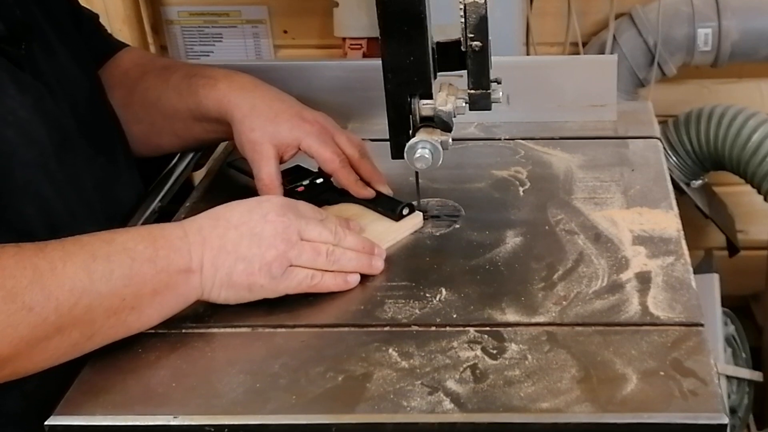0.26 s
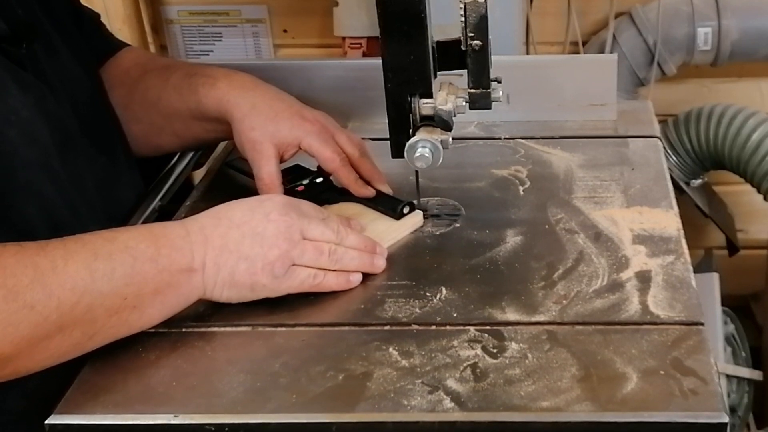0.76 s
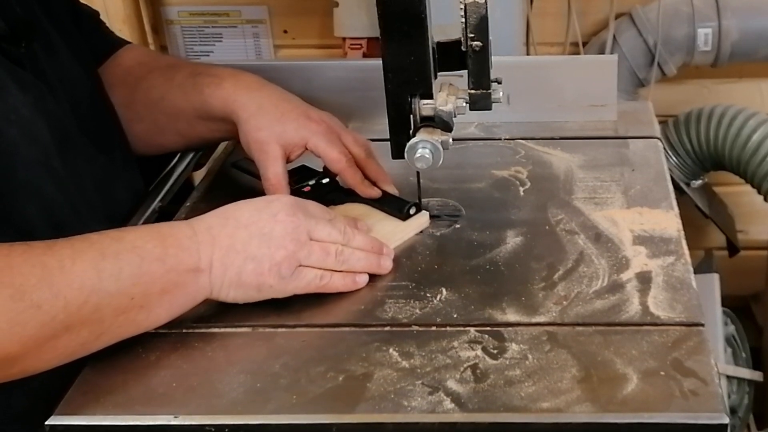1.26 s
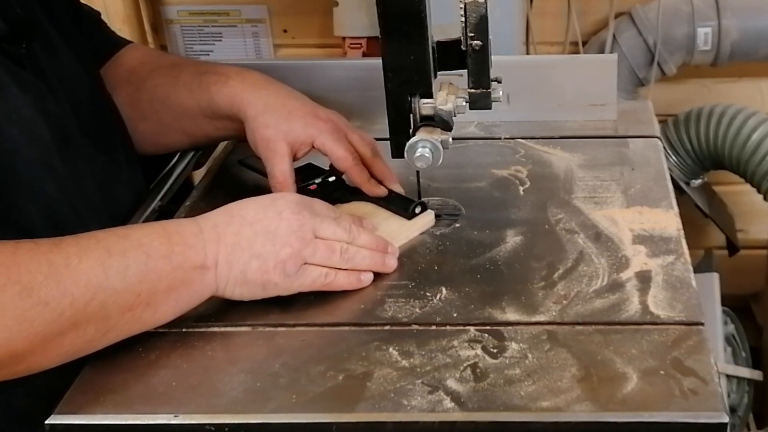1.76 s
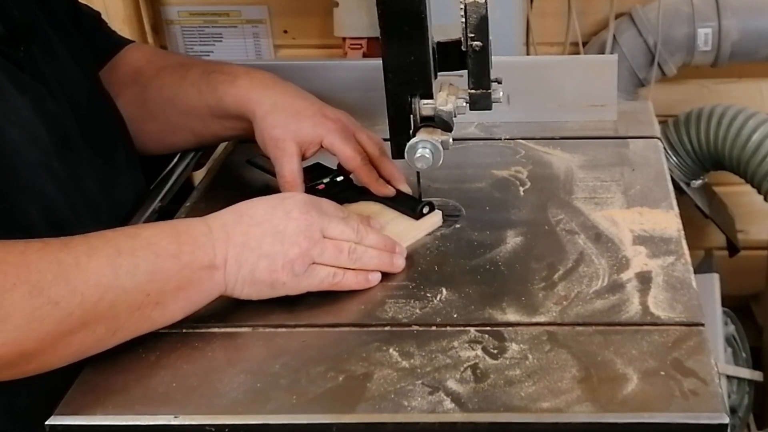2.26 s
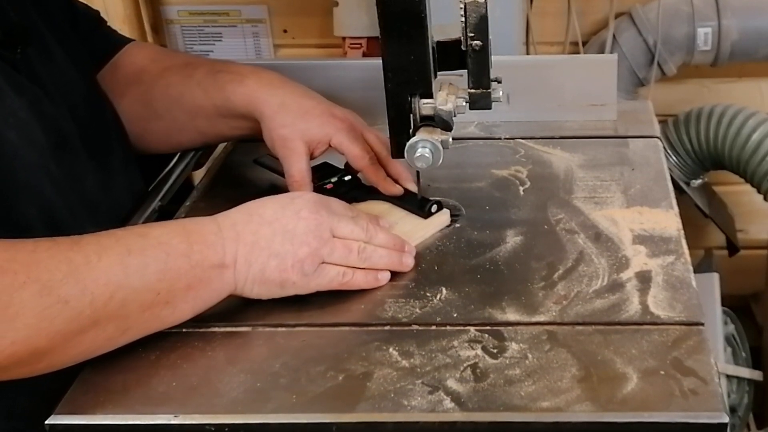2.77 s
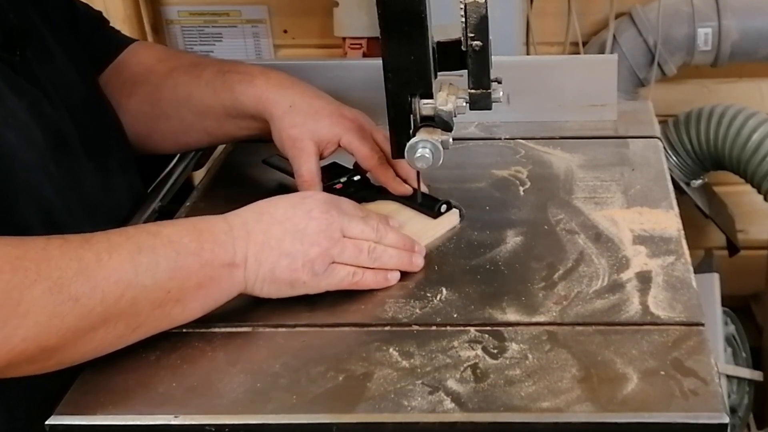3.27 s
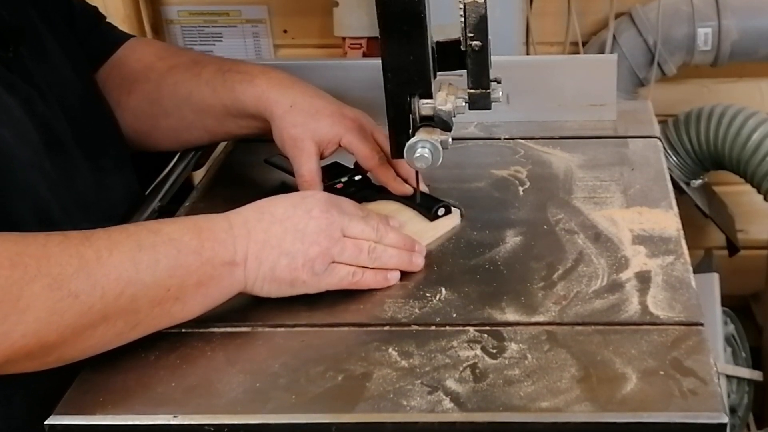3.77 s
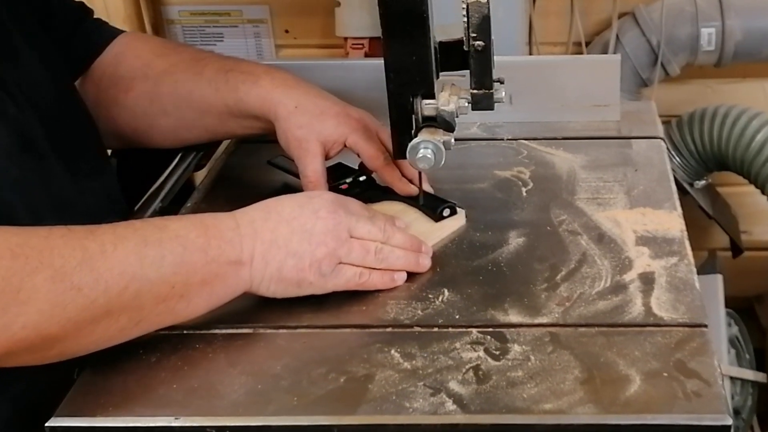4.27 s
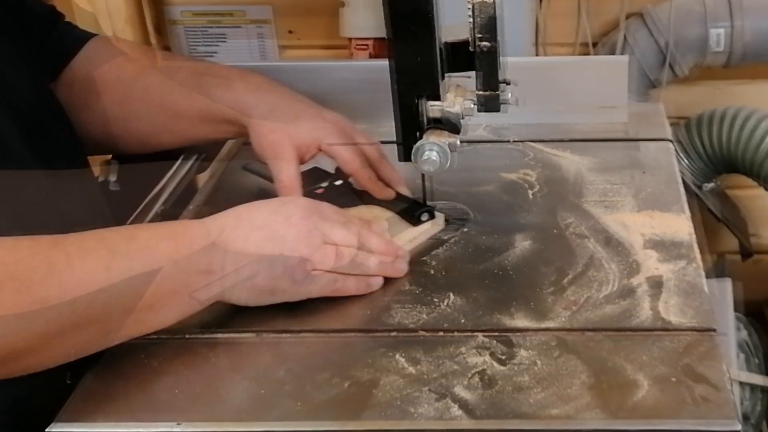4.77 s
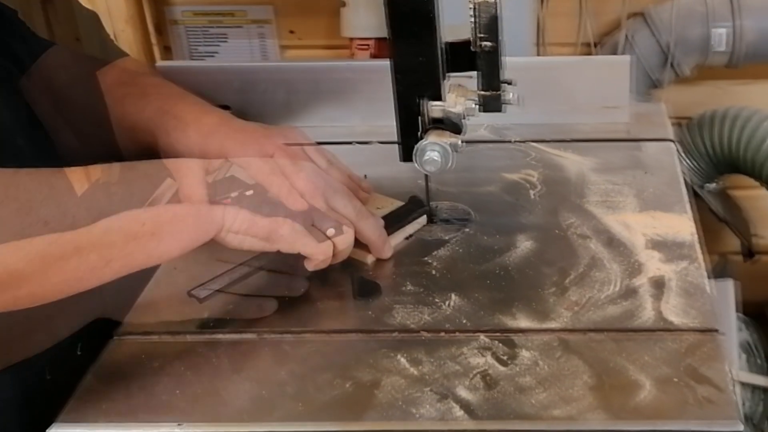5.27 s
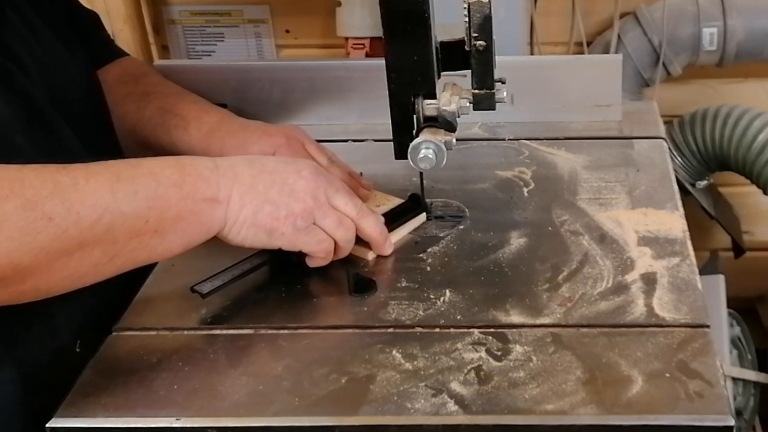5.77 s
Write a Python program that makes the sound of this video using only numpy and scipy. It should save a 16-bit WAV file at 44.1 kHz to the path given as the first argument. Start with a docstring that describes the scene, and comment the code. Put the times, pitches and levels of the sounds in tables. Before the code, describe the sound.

Close and fairly dry, in a small cluttered workshop, with a low machine hum and soft extractor air underneath throughout. From 0 to 1.2 seconds a small wooden piece grazes and chatters on a bandsaw blade: a rough, uneven rasp with a sharp snag and falling twang near 0.5, then rough pulsing tones around 1. At about 1.25 the teeth bite loudly with a piercing squeal and a ringing blade tone. From 1.7 to 3.5 the cut is dense and bright, fluttering rapidly, with whistles and a high screech strongest around 2.3 to 3.2. It breaks off near 3.8. Until 5.1 only light rubs, scrapes, tiny cracks and faint downward twangs interrupt the hum, one longer rub at 4.4 to 4.6. The blade runs free briefly, then at 5.3 a second cut starts, rasping harder from 5.7 with a faint ring, continuing to the end at about 6.

```python
"""In a workshop, close by, a bandsaw cuts a curve in a small piece of wood.
The piece chatters against the blade, then the teeth bite and the blade sings as it twists in the kerf (the slot).
The piece is eased back and rubs, the blade runs free for a moment, and a second cut begins; the machine hums below.
Tooth pulses and torn-fibre noise make the bites, short noise cracks the snags, coloured noise the air and hum,
wavering sine waves the blade's tones, and gliding narrow bands of noise its twangs."""
import sys
import numpy as np
from scipy import signal
from scipy.fft import rfft, irfft
from scipy.io import wavfile
from scipy.ndimage import uniform_filter1d, minimum_filter1d

SR = 44100
rng = np.random.default_rng(int(sys.argv[2]) if len(sys.argv) > 2 else 0)


def master(y):
    """Save y as 16-bit WAV."""
    cut = np.clip(np.atleast_2d(y).T, -1, 1)
    pcm = np.round(cut * 32767)  # scale
    wavfile.write(sys.argv[1], SR, pcm.astype(np.int16))


N = 266136
TIME = np.arange(N) / SR
FREQ = np.fft.rfftfreq(8192, 1 / SR)  # where the colour of a sound is set, in Hz
# average rates of the passing teeth, the blade's twisting and bending modes, and the bouncing piece
TOOTH_HZ, TWIST_HZ, BEND_HZ, BOUNCE_HZ = 3388.4, 1025, 785, 138
TONE_RISE_S, TONE_RELEASE_S = 0.022, 0.03  # the tones given by start and end swell and die away alike


def amp(db):
    """Turns decibels into gain."""
    return 10 ** (np.asarray(db) / 20)


def unit(x):
    """Scales a sound to an rms of one."""
    return x / np.sqrt(np.mean(x ** 2) + 1e-20)


def steady(x, size=1800):
    """Evens out the level from moment to moment (size in samples), keeping the fine grain."""
    power = uniform_filter1d(uniform_filter1d(x ** 2, size), size)
    return x / np.sqrt(abs(power) + 1e-12)


def wander(hz):
    """Makes a smooth random curve of unit rms that changes about hz times a second."""
    f = np.fft.rfftfreq(N, 1 / SR)
    spectrum = rfft(rng.standard_normal(N)) * np.exp(-(f / hz) ** 2)
    return unit(irfft(spectrum, N))


def angle(hz, drift, drift_hz):
    """Adds up the phase of an oscillation whose rate drifts a little."""
    return 2 * np.pi * np.cumsum(hz * (1 + drift * wander(drift_hz))) / SR


def band(x, lo_hz, hi_hz, order=4):
    """Keeps only the pitches between two limits."""
    sos = signal.butter(order, [lo_hz, min(hi_hz, .49 * SR)], "band", fs=SR, output="sos")
    return signal.sosfilt(sos, x)


def read(points, hz):
    """Reads a colour table, joined by straight lines on a log-frequency axis."""
    f, value = np.transpose(points)
    return np.interp(np.log(hz + 1), np.log(f + 1), value)


def resonances_db(modes):
    """Turns narrow peaks and dips into a gain at each of FREQ."""
    return sum(db / (1 + (2 * (FREQ - hz) / width) ** 2) for hz, width, db in modes)


def ring(x, db):
    """Passes a sound through a body that has this gain at each of FREQ and answers only after each blow."""
    log_gain = np.log(amp(np.r_[db, db[-2:0:-1]]))
    # the Hilbert transform finds the phase that makes the body answer as early as it can
    response = np.fft.ifft(np.exp(np.conj(signal.hilbert(log_gain)))).real
    return signal.oaconvolve(x, response[:len(response) // 2])[:N]


def swell(rows):
    """Follows a level curve as a gain, silent outside its span."""
    s, db = np.transpose(rows)
    return amp(np.interp(TIME, s, db, left=-120, right=-120))


def held(start, end, rise_s, release_s):
    """Rises, holds and dies away."""
    rise = np.clip((TIME - start) / rise_s, 0, 1)
    return rise * np.exp(-np.maximum(TIME - end, 0) / release_s)


def sung(rows):
    """Gives the gain of a tone that sings up and dies away once for each row."""
    return sum(amp(db) * held(start, end, TONE_RISE_S, TONE_RELEASE_S) for start, end, db in rows)


# drone of the frame: [t/s, level/dB]
DRONE = [(0.0, -57), (0.1, -41.5), (0.28, -50), (0.4, -41.5), (0.52, -57), (0.97, -44.5), (1.44, -63),
         (4.59, -52), (4.8, -44), (4.85, -60.5), (5.62, -54.5), (5.78, -69), (6.03, -54)]
# its colour: [f/Hz, level/dB]
DRONE_COLOUR = [(60, -46), (120, -23), (150, -17), (178, -3), (200, -2.5), (225, -2.5), (270, -12),
                (330, -25), (500, -57), (1000, -60)]
# colour of the dust extractor's air: [f/Hz, level/dB]
AIR_COLOUR = [(25, -20), (70, -11), (200, 4), (350, -1), (600, -0.5), (1000, -3), (1600, -9.5), (3000, -24),
              (6000, -29.5), (9000, -37), (15000, -58)]


def machine(air_db=-56):
    """The wheels shake the frame into a low drone, and the extractor draws air: two coloured noises."""
    drone = steady(ring(rng.standard_normal(N), read(DRONE_COLOUR, FREQ)), size=3000)
    air = unit(ring(rng.standard_normal(N), read(AIR_COLOUR, FREQ)))
    s, drone_db = np.transpose(DRONE)
    return amp(np.interp(TIME, s, drone_db)) * drone + amp(air_db) * air


# the blade snatches (+) or slips (-) for a moment: [t/s, half length/s, change of level/dB]
SURGES = [(0.12, 0.0076, 0.5), (.153, .011, 4.5), (0.595, 0.009, 5.5), (0.497, 0.022, 6.5),
          (0.667, 0.006, 7.5), (0.893, 0.018, 4), (.985, 0.011, -2), (1.241, 0.0048, -10),
          (1.445, .012, -2), (1.575, 0.048, -5.5), (1.616, 0.011, 10), (1.656, 0.018, -9),
          (1.877, 0.019, -4), (1.944, 0.013, -5.5), (1.981, 0.017, 3.5), (2.014, 0.014, -5.5),
          (2.178, .012, -2), (2.318, 0.0091, -3.5), (2.381, .012, -5.5), (2.751, 0.032, -4),
          (2.81, 0.011, -7), (3.455, .008, 4.5), (3.481, 0.014, -6.5), (3.75, 0.0057, 5.5),
          (5.737, 0.0058, 5.5), (5.875, 0.0077, 8)]


def surging(sway_db, sway_hz=16.1, sway_at_s=2.343):
    """The level changes, in dB, as the running blade sways to and from the wood, snatches and slips."""
    sway = sway_db * np.cos(2 * np.pi * sway_hz * (TIME - sway_at_s))  # presses hardest at sway_at_s
    return sway + sum(db * np.exp(-((TIME - s) / half_s) ** 2) for s, half_s, db in SURGES)


# how hard the piece is fed in the first cut, before the surges: [t/s, level/dB]
FIRST_FEED = [(0, -23.5), (.22, -29), (.34, -25.5), (.44, -29.5), (.462, -23), (.8, -26.5), (1.225, -28),
              (1.28, -19), (1.43, -14.5), (1.55, -21.5), (2.05, -21.5), (2.6, -18), (2.95, -19),
              (3.265, -21), (3.3, -16.5), (3.52, -26), (3.62, -17.5), (3.75, -17.5), (3.785, -30.5),
              (3.89, -56)]
# light drag in the kerf as the piece is eased back, until the blade runs free: [t/s, level/dB]
DRAG = [(3.8, -34.5), (4.08, -42), (4.3, -44), (4.46, -38.5), (4.78, -44), (5.06, -46), (5.2, -67.5),
        (5.31, -78)]
# the feed of the second cut: [t/s, level/dB]
SECOND_FEED = [(5.308, -54.5), (5.335, -30.5), (5.385, -24.5), (5.55, -29.5), (5.68, -17.5), (5.81, -23.5),
               (5.925, -27), (5.98, -16), (6.04, -17.5)]
# the side of the kerf rubs on the blade: [start t/s, end t/s, rise/s, blade level/dB, wood level/dB]
RUBS = [(3.957, 4.055, 0.013, -27, -49), (4.099, 4.116, .01, -33.5, -60), (4.132, 4.15, 0.021, -31, -41),
        (4.369, 4.438, 0.1, -20, -31), (4.522, 4.64, 0.032, -27.5, -36), (4.667, 4.684, .014, -33, -41),
        (4.708, 4.719, .01, -35, -42.5), (4.743, 4.748, 0.0018, -34, -30.5),
        (4.808, 4.892, .004, -37.5, -49), (4.89, 4.912, .012, -41, -58), (4.943, 4.956, 0.015, -35, -56),
        (5.02, 5.029, 0.017, -28.5, -39), (5.058, 5.06, .003, -30, -31)]


def loads(surge_db, knock_db, wood_surge=0.68, rub_release_s=0.01):
    """Blade and wood are driven by the feed with its surges, and by the single rubs."""
    feed = swell(FIRST_FEED) + swell(DRAG) + swell(SECOND_FEED)
    blade = feed * amp(surge_db)
    wood = feed * amp(knock_db + wood_surge * surge_db)
    for start, end, rise_s, blade_db, wood_db in RUBS:
        touch = held(start, end, rise_s, rub_release_s)
        blade = np.hypot(blade, amp(blade_db) * touch)
        wood = np.hypot(wood, amp(wood_db) * touch)
    return blade, wood


# colour of blade and wood in each kind of work, each table: [f/Hz, level/dB]
GRAZE = [(100, -33.5), (330, -22.5), (610, -23.5), (750, -1.5), (880, 7.5), (1020, -1), (1470, 3.5),
         (2300, -12.5), (3750, -7), (5200, -12.5), (5800, -15), (6240, -21.5), (7790, -25.5),
         (11570, -46.5), (13370, -37.5), (15000, -49)]
BITE = [(100, -71), (330, -42), (820, 4), (2040, 7), (2300, 0.5), (2830, 8.5), (5200, 3.5), (5800, -1),
        (6240, -6), (7370, -1), (8290, -20.5), (12100, -29.5), (13000, -21.5), (15000, -28)]
CUT = [(100, -70.5), (330, -33), (610, -21.5), (750, 0.5), (2040, -2), (2150, -3.5), (2960, -7.5),
       (4640, 2), (7370, -6.5), (9350, -24), (11230, -20), (12450, -30), (13370, -27.5), (15000, -31)]
DEEP = [(100, -42), (330, -21), (610, -24), (750, -1), (2040, -0.5), (2250, -12), (2830, -2), (3140, -7.5),
        (3450, -5.5), (5450, 10), (5800, -4.5), (6400, -6.5), (8200, -15), (9820, -31), (10600, -26),
        (12450, -29), (14000, -38), (15000, -31.5)]
BREAKOUT = [(120, -68), (200, -28), (540, -30.5), (647, -16.5), (761, -15.5), (1040, -4.5), (1330, -3.5),
            (2170, -7), (2460, -13), (3470, -4), (4240, -8), (5660, -6.5), (15000, -46.5)]
RUB = [(100, -28), (330, -31.5), (750, -4.5), (1090, 8.5), (1380, 0.5), (2420, -2), (3610, 0), (5030, -0.5),
       (5620, -6), (6240, -9.5), (7090, -6), (8810, -28), (12730, -26), (15000, -46)]
MEET = [(120, -39), (200, -22), (363, -41), (427, -27), (636, -30.5), (849, -1.5), (1330, -6), (1780, 1.5),
        (2550, -9), (3470, -3), (4310, -13.5), (5070, -11), (15000, -51.5)]
SECOND = [(100, -58), (330, -51), (820, -2.5), (1560, 2), (1790, -2), (2420, -7), (3950, -2), (4260, -2.5),
          (5200, -6.5), (7090, -15.5), (7790, -12.5), (8290, -25), (12730, -39), (15000, -39)]
# stages of the work: [start t/s, colour, then three levels against the load: wood knock level/dB,
# set tone level/dB, side ring level/dB; sway/dB, blade twist depth, bouncing of the piece,
# depth of the tooth set, unevenness of the bites, torn fibre share 0-1]
STAGES = [(0, GRAZE, -11, -11, -14, 0, .04, 0.38, 0.23, 0.51, 0.96),
          (.45, GRAZE, -10.5, -7.5, -21, 0.66, 0.056, 0.95, 0.27, 0.31, 0.99),
          (.94, GRAZE, -14, -0.5, -4.5, 0, .05, 0.039, 0.55, 0.5, 0.99),
          (1.27, BITE, -6.5, -18.5, -36, 0, 0.27, 0.12, .05, 0.82, 0.99),
          (1.68, CUT, -7, -32, -47, 0.38, 0.73, 0.097, 0.038, 0.84, 0.98),
          (2.2, CUT, -13, -27, -47, 0.92, 0.98, 0.2, .05, 0.36, 0.68),
          (2.55, DEEP, -13.5, -29, -56, 0.63, 0.97, .08, 0.082, 0.08, 0.45),
          (3.53, BREAKOUT, -8.5, -13.5, -34, 0, 0.95, 0.042, 0.12, 0.26, 0.97),
          (3.86, RUB, -5.5, -13, -2.5, 0, .04, 0.45, 0.5, 0.76, 0.82),
          (4.14, RUB, -3.5, -3, -13, 0, .04, 0.12, 0.57, 0.55, 0.91),
          (5.25, MEET, -5.5, -8, -13, 1.1, 0.062, 0.16, .2, 0.17, 0.89),
          (5.6, SECOND, -6, -16, -32.5, 0.38, 0.087, .18, 0.12, 0.61, 0.99)]


def by_stage(values, blend_s=0.21):
    """Takes one value for each stage and blends them where the stages meet."""
    return values[0] + sum((after - before) * np.clip((TIME - row[0]) / blend_s + .5, 0, 1)
                           for before, after, row in zip(values, values[1:], STAGES[1:]))


def contact():
    """The wood meets the teeth in a changing way: the number columns of STAGES, sample by sample."""
    _, _, *columns = zip(*STAGES)
    return [by_stage(column) for column in columns]


def teeth(turn, twist_angle, bend_angle, grip, bend_depth=0.32, clump=0.25, clump_hz=300):
    """Each tooth strikes and tears fibre; its bite varies with the set, the blade's sway and the bouncing piece."""
    twist, bounce, tooth_set, uneven, tearing = grip
    blows = unit(sum(np.cos(k * turn) for k in range(1, 5)))
    sway = twist * (np.cos(twist_angle) + bend_depth * np.cos(bend_angle))
    hop = bounce * np.cos(angle(BOUNCE_HZ, drift=0.0617, drift_hz=56.9))
    # the tooth set repeats every third tooth
    bite = np.exp(sway + hop + tooth_set * np.cos(turn / 3) + clump * wander(clump_hz))
    torn = np.clip(tearing, 0, 1)
    struck = unit(blows * np.exp(uneven * wander(3600)))
    fibres = unit(rng.standard_normal(N) * (1 + 0.85 * np.cos(turn)))
    return steady(bite * (np.sqrt(1 - torn) * struck + np.sqrt(torn) * fibres))


# narrow peaks and dips of blade, guides and table: [f/Hz, width/Hz, lift level/dB]
STEEL = [(482.4, 77, 17.5), (617, 24.4, 13.5), (864.4, 15.3, 8), (1523, 27, 1.5), (1420, 44, 6),
         (1854, 50, 9), (2090, 46, 6), (2283, 8.7, -16), (2725, 41, 10.5), (3677, 180, 8),
         (4300, 150, -2.5), (4270, 26, 1), (4490, 21, 13), (5093, 130, -13.5), (5870, 190, 8.5),
         (6480, 66, -3)]
# the same in the second cut, which rings differently: [f/Hz, width/Hz, lift level/dB]
SECOND_STEEL = [(465, 190, 18.5), (836, 36, 14), (1770, 16, 10), (1824, 52, 14), (1893, 130, 13.5),
                (2310, 31, 16), (2540, 70, 1), (3390, 25, 6.5), (3920, 45, 11), (4060, 88, 3),
                (4347, 70, -24), (4360, 70, 16), (5080, 13, 16), (5230, 38, 10)]


def rasp(drive, blade_load, wood_load, rasp_db=-2.0, split_hz=2250):
    """The bites ring blade (above the split) and wood (below), whose colour changes as the cut goes on."""
    stage_sounds = []
    for _, colour, *_ in STAGES:
        steel = SECOND_STEEL if colour == SECOND else STEEL
        stage_sounds.append(unit(ring(drive, read(colour, FREQ) + resonances_db(steel))))
    sound = by_stage(stage_sounds)
    low = signal.sosfiltfilt(signal.butter(6, split_hz, fs=SR, output="sos"), sound)
    blade = blade_load * steady(sound - low)
    # the wood is evened out by its power in the knocking range
    knock_power = uniform_filter1d(band(low, 1200, 2250) ** 2, size=4000)
    wood = wood_load * low / np.sqrt(abs(knock_power) + 1e-12)
    return amp(rasp_db) * blade + wood


def wavering(turn, rough, hz=45):
    """Makes a tone that is unsteady in both strength and phase."""
    return np.cos(turn) * (1 + rough * wander(hz)) + rough * wander(hz) * np.sin(turn)


# the tone of the tooth set sings up, before set_db: [start t/s, end t/s, level/dB]
SET_SWELLS = [(.92, .96, -25), (1.0, 1.05, -24.5), (1.09, 1.137, -22), (1.172, 1.21, -23),
              (1.24, 1.3, -25.5), (4.03, 4.11, -41), (4.14, 4.34, -50), (4.39, 4.47, -32.5),
              (4.53, 4.63, -26.5), (4.88, 4.93, -34.5)]
# its partials when the teeth graze the side of the kerf: [multiple of the set tone, relative level/dB]
SET_PARTIALS = [(3, -5), (4, -3), (5, 0)]


def set_tone(tone_load, side_load, set_db=-2, grazing_db=-3, set_rough=0.55):
    """The left-right-straight tooth set gives a rough tone, and a thin ring where it grazes the kerf's side."""
    turn = angle(TOOTH_HZ / 3, drift=0.00427, drift_hz=24.7)
    tone = steady(wavering(turn, set_rough))
    overtones = sum(amp(db) * wavering(k * turn, set_rough) for k, db in SET_PARTIALS)
    tone_level = np.hypot(tone_load, sung(SET_SWELLS))
    return amp(set_db) * tone_level * tone + amp(grazing_db) * side_load * overtones


# the piece snags on a tooth: [t/s, peak level/dB before snag_db and the ringing]
SNAGS = [(0.4599, -6), (0.7492, -10), (3.8192, -17), (3.9534, -12), (3.9729, -14), (4.0048, -12),
         (4.7127, -23), (4.7461, -23), (4.8194, -10), (4.8354, -14), (4.8604, -17), (4.8718, -15),
         (5.0295, -22), (5.0574, -23)]


def snags(snag_db=-5, tear_s=.0025):
    """A tooth catches and lets go: a short crack of noise rings the blade."""
    out = np.zeros(N)
    age = np.arange(SR // 50) / SR
    for s, db in SNAGS:
        crack = rng.standard_normal(len(age)) * np.exp(-age / tear_s)
        part = out[round(s * SR):][:len(age)]
        part += amp(db + snag_db) * (crack / abs(crack).max())[:len(part)]
    # [f/Hz, level/dB]
    colour = [(100, -52), (500, 1), (1000, -9.0), (2300, 7.5), (3500, 7), (7000, 7.0), (8500, -8.5),
              (15000, -22.0)]
    # [f/Hz, width/Hz, lift level/dB]
    modes = [(1100, 190, 22), (1850, 130, 1.7), (3430, 170, 8.3), (4450, 170, 2.7), (5490, 340, 13.1),
             (7170, 100, 15.4), (7600, 90, 7)]
    return ring(out, read(colour, FREQ) + resonances_db(modes))


# the blade twangs downward as its load lets go:
# [t/s, length/s, start f/Hz, end f/Hz, level/dB before twang_db]
TWANGS = [(0.467, 0.11, 875, 725, -26.5), (3.71, 0.27, 472, 330, -43.5), (4.573, 0.12, 1170, 973, -27),
          (4.584, 0.16, 760, 528, -43.5), (4.813, 0.11, 758, 585, -43), (5.07, 0.085, 923, 705, -41.5),
          (5.229, 0.24, 1118, 953, -42.5)]


def twangs(width_hz=100, twang_db=-2):
    """Bending waves run round the steel loop as a blurred band, the high ones arriving first."""
    out = np.zeros(N)
    grain = wander(width_hz) + 1j * wander(width_hz)
    for s, length, start_hz, end_hz, db in TWANGS:
        part = np.clip((TIME - s) / length, 0, 1)  # how much of the twang has gone by, 0-1
        turn = 2 * np.pi * np.cumsum(start_hz * (end_hz / start_hz) ** part) / SR
        level = amp(db + twang_db) * np.sin(np.pi * np.sqrt(part))
        out += level * (grain * np.exp(1j * turn)).real
    return out


def partials(multiples, strengths_db, angles, flutter):
    """Fluttering tones sound at sums and differences of the tooth, twist and bend rates."""
    out = np.zeros(N)
    for row, db in zip(multiples, strengths_db):
        turn = sum(k * a for k, a in zip(row, angles))
        out += amp(db) * unit(np.cos(turn) * (1 + flutter * wander(39)))
    return out


# the teeth squeal at their own rate, before squeal_db: [start t/s, end t/s, level/dB]
SQUEALS = [(1.255, 1.333, -17.5), (1.345, 1.53, -34), (1.667, 2.76, -24), (2.85, 3.06, -24),
           (3.2, 3.612, -30), (3.265, 3.42, -21)]
# whistle where the twisting blade beats against the teeth, before whistle_db: [t/s, level/dB]
WHISTLE = [(1.7, -33.5), (2.4, -29), (2.7, -25), (3.05, -23), (3.4, -42), (3.55, -37)]
# partials of the whistle: [multiple of the tooth rate, of the twist, of the bend]
BEATS = [(1, 2, 0), (1, 3, 0), (1, 1, 1), (1, 0, 1), (2, 2, 0), (0, 2, 0), (1, 1, 0)]
# and their strengths: [relative level/dB]
BEATS_DB = [2, -1.5, -2, -3, -24, -12.5, -4.5]
# the teeth screech when they bear hardest, before screech_db: [start t/s, end t/s, level/dB]
SCREECHES = [(2.03, 2.31, -26.5), (2.33, 2.735, -23), (2.83, 3.2, -26.5)]
# partials of the screech: [multiple of the tooth rate, of the twist, of the bend]
SCREECH_PARTIALS = [(2, 0, 0), (2, -1, 0), (3, 0, 0), (3, -1, 0), (3, 1, 0)]
# and their strengths: [relative level/dB]
SCREECH_DB = [-3, -14, -42, -23, -30]


def squeal(turn, twist_angle, bend_angle, squeal_db=-2, whistle_db=-3.0, screech_db=-1.0):
    """The teeth squeal at their rate and screech mainly an octave up; the swaying blade adds whistling partials."""
    angles = turn, twist_angle, bend_angle
    tone = unit(np.sin(turn) * (1 + 0.4 * wander(38) + 0.08 * wander(250)))  # slow flutter and fine grit
    whistle = partials(BEATS, BEATS_DB, angles, flutter=0.52)
    screech = partials(SCREECH_PARTIALS, SCREECH_DB, angles, flutter=.25)
    return (amp(squeal_db) * sung(SQUEALS) * tone
            + amp(whistle_db) * swell(WHISTLE) * whistle
            + amp(screech_db) * sung(SCREECHES) * screech)


# the blade rings in its twisting mode, damped more and more as the kerf closes round it:
# [start t/s, end t/s, level/dB before twist_db, damping in dB per s]
TWISTS = [(1.28, 3.58, -17, 7.5), (3.637, 3.755, -28.5, 0), (5.722, 6.04, -27.5, 1)]


def singing(twist_angle, twist_db=-1, octave_db=-12):
    """The blade, twisting to and fro in the kerf, sings at that rate and faintly an octave up."""
    twist = np.cos(twist_angle) * (1 + 0.22 * wander(41))
    twist += amp(octave_db) * np.cos(2 * twist_angle) * (1 + 0.5 * wander(33))
    level = np.zeros(N)
    for start, end, db, damping in TWISTS:
        damped_db = db - damping * np.maximum(TIME - start, 0)
        level += amp(damped_db) * held(start, end, TONE_RISE_S, TONE_RELEASE_S)
    return amp(twist_db) * level * unit(twist)


def workshop(x, wet_db=-13, t60=0.13):
    """The table and a small, cluttered room send back sparse echoes that fall by 60 dB in t60 seconds."""
    age = np.arange(SR // 2) / SR
    sparse = rng.random(len(age)) < 2500 / SR  # about 2500 echoes a second
    taps = rng.standard_normal(len(age)) * sparse * (age > .003) * amp(-60 * age / t60)
    return x + amp(wet_db) * signal.oaconvolve(x, taps / np.linalg.norm(taps))[:N]


def scene(tone_surge=2.12):
    """Teeth and blade share one motion and follow the load; singing and squeal sag when the blade slips."""
    turn = angle(TOOTH_HZ, drift=0.00056, drift_hz=23.3)
    twist_angle = angle(TWIST_HZ, drift=0.00546, drift_hz=29.6)
    bend_angle = angle(BEND_HZ, drift=0.02575, drift_hz=59.2)
    knock_db, set_db, side_db, sway_db, *grip = contact()
    surge_db = surging(sway_db)
    blade_load, wood_load = loads(surge_db, knock_db)
    bites = teeth(turn, twist_angle, bend_angle, grip)
    cutting = rasp(bites, blade_load, wood_load) + snags()
    sag = amp(tone_surge * np.minimum(surge_db, 0))
    tones = sag * (singing(twist_angle) + squeal(turn, twist_angle, bend_angle))
    tones += set_tone(blade_load * amp(set_db), blade_load * amp(side_db))
    return (workshop(cutting) + tones + twangs() + machine())[None]


def record(dry, ceiling=0.67, knee=0.33, thump_db=10, edge_hz=15350):
    """A fast limiter holds the peaks, shrill overloads leave a faint low thump, and the top is cut at edge_hz."""
    allowed = np.minimum(1, ceiling / (abs(dry) + 1e-9))
    limited = dry * uniform_filter1d(minimum_filter1d(allowed, size=41), size=41)
    overload = np.maximum(abs(band(limited, 4270, 13000, order=2)) - knee, 0)
    out = limited + amp(thump_db) * band(overload, 19, 120, order=2)
    low_pass = signal.firwin(511, edge_hz, window=("kaiser", 9), fs=SR)
    return signal.oaconvolve(out, low_pass[None], "same")


dry = scene()
out = record(dry)
master(out)
```